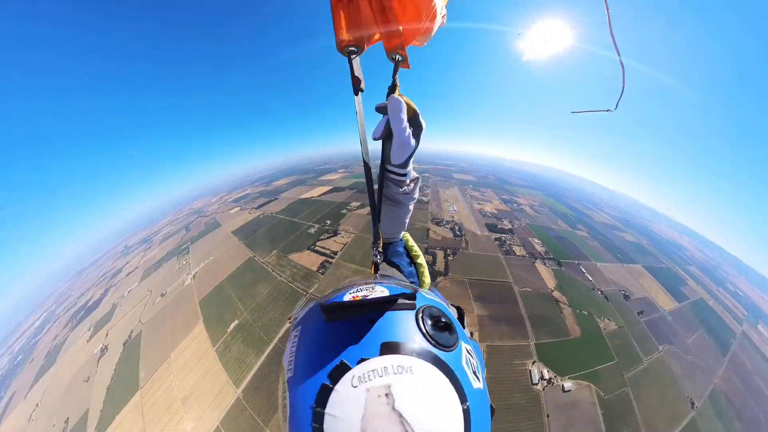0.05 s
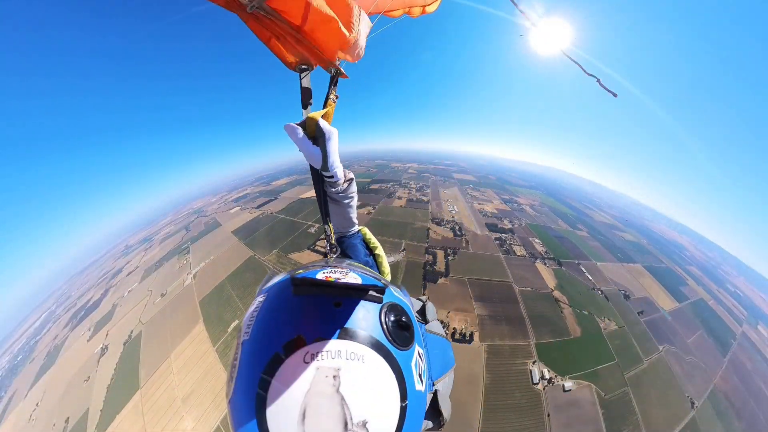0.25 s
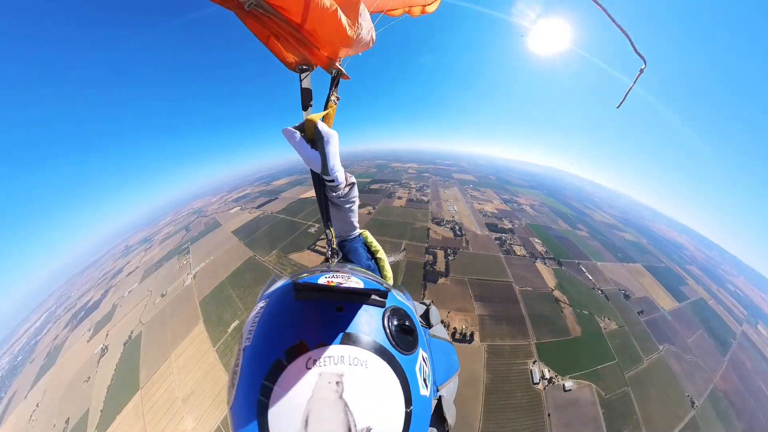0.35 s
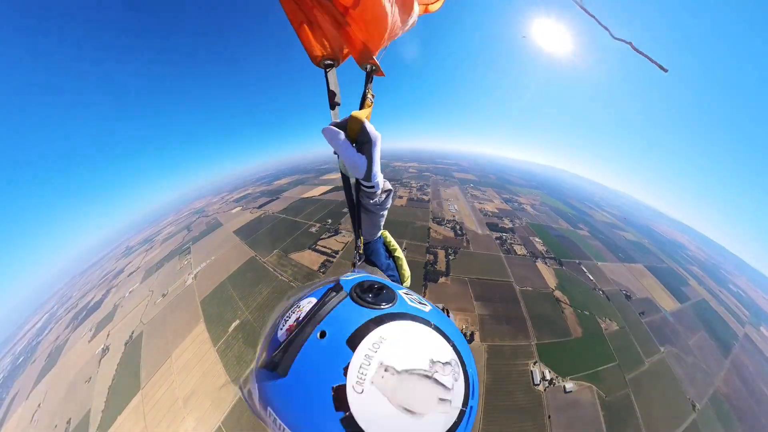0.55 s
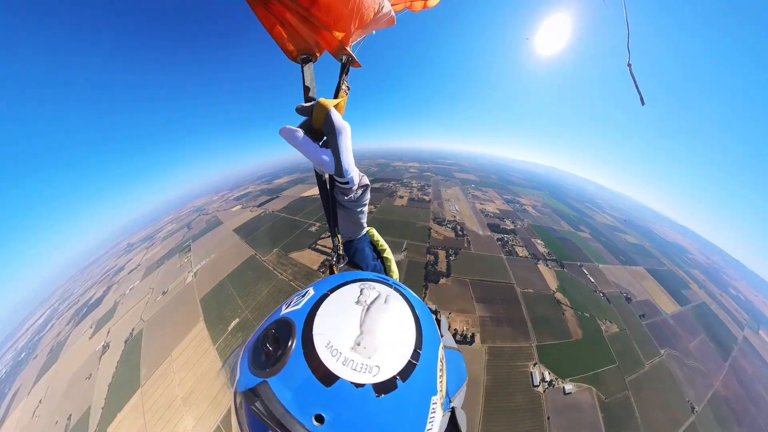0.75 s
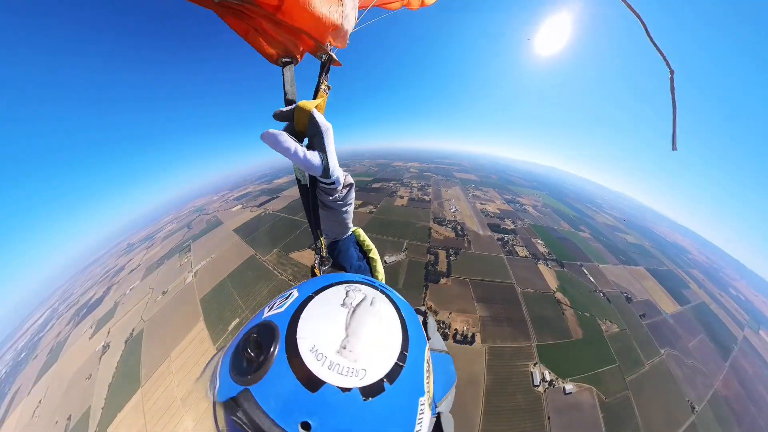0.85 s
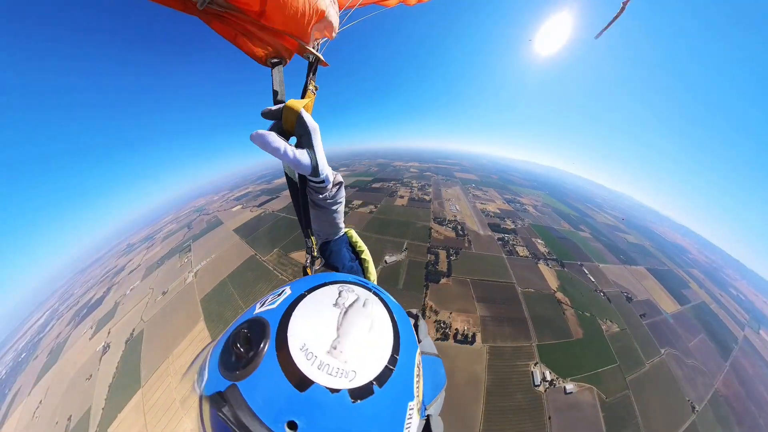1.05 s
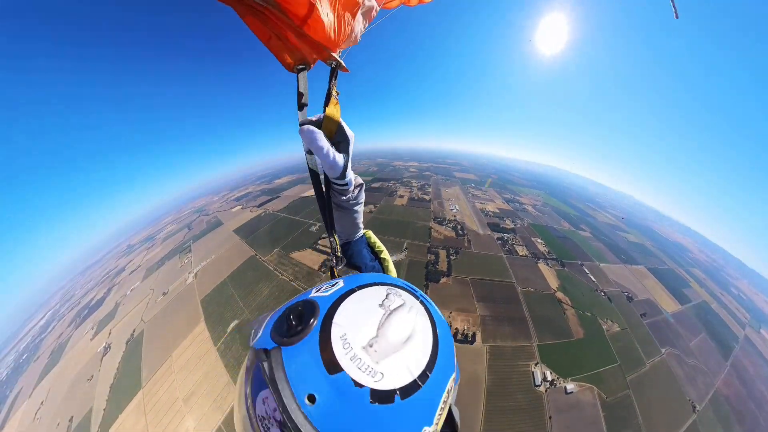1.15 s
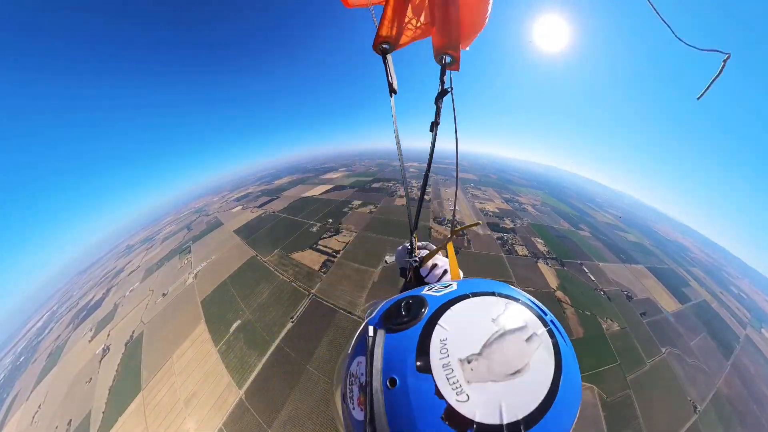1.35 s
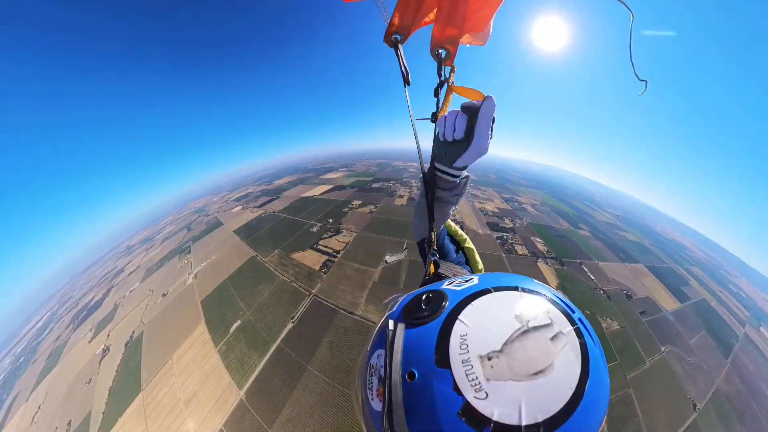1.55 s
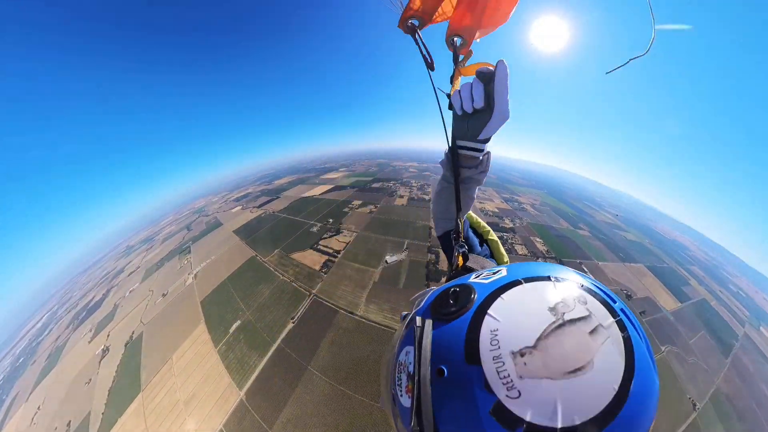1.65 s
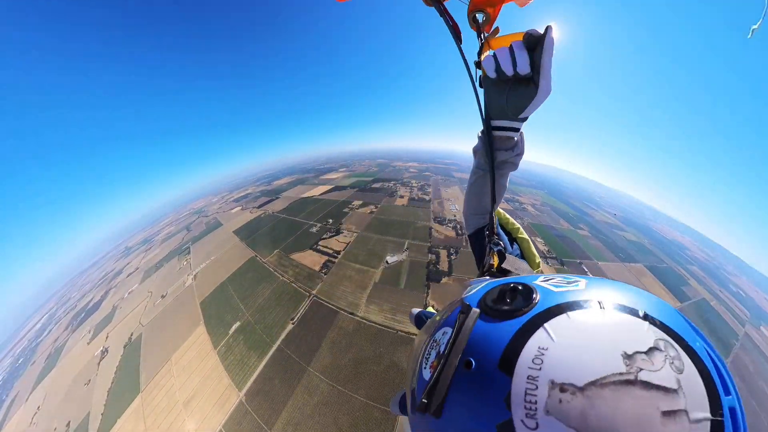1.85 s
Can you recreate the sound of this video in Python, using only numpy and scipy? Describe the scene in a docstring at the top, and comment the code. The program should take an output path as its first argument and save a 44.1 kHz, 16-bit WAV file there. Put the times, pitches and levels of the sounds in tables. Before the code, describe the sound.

Wind buffets a camera microphone under an open parachute, in two rough gusts with a weaker one between and fabric snapping at their peaks. Then the rigging bumps the mount and straps tick in softer airflow.

```python
"""A low rush of air, then two long gusts with a weaker one between, buffeting a camera microphone
under a parachute. Each gust is a lumpy roar of turbulent eddies with a grainy rasp on top, and taut
fabric snaps at the height of the long ones. Afterwards the rigging bumps the camera mount, a line
swishes, straps tick and buckles jingle in the steady airflow."""
import sys
import numpy as np
from scipy import signal
from scipy.fft import rfft, irfft, next_fast_len
from scipy.io import wavfile
from scipy.ndimage import uniform_filter1d, minimum_filter1d

SR = 44100
rng = np.random.default_rng(int(sys.argv[2]) if len(sys.argv) > 2 else 0)


def dump_mix(stems):
    """Bounce the given channels to the path in sys.argv[1] as a 16-bit WAV at rate SR."""
    frames = np.atleast_2d(stems).T  # one column per channel
    limited = np.clip(frames, -1, 1)  # hard clip at full scale
    pcm = np.round(limited * 32767).astype(np.int16)
    wavfile.write(sys.argv[1], SR, pcm)


N = 83790
TIME = np.arange(N) / SR

# Envelopes of the wind. Each row: time in seconds, level in dB.
FLOW_ENVELOPE = [(0, -45), (0.17, -44.5), (0.3, -29.5), (1.3, -51), (1.47, -33.5), (1.525, -38),
                 (1.548, -27), (1.575, -34.5), (1.635, -37), (1.67, -31), (1.705, -40.5), (1.745, -34),
                 (1.78, -41), (1.9, -39.5)]  # airflow of the glide
RUMBLE_ENVELOPE = [(0, -46.5), (0.16, -43), (0.28, -31.5), (0.5, -41.5), (0.75, -34), (0.95, -43.5),
                   (1.3, -35), (1.52, -37), (1.62, -33), (1.68, -42.5), (1.9, -41.5)]  # low rumble of the mount
RASP_ENVELOPE = [(0.195, -100), (0.21, -57), (0.221, -30.5), (0.28, -26.5), (0.43, -28.5), (0.48, -31.5),
                 (0.61, -29.5), (0.695, -34), (0.72, -48.5), (0.85, -50.5), (0.872, -31), (0.922, -21),
                 (0.96, -39), (1.0, -40), (1.06, -30.5), (1.12, -28.5), (1.24, -34), (1.27, -41.5),
                 (1.345, -35.5), (1.38, -43), (1.41, -59), (1.6, -61.5), (1.8, -95)]  # coarse grains
FIZZ_ENVELOPE = [(0.22, -100), (0.24, -66), (0.28, -53.5), (0.35, -55), (0.405, -46.5), (0.48, -58.5),
                 (0.62, -54.5), (0.68, -58.5), (0.73, -94), (0.86, -92), (0.92, -50.5), (1.0, -64.5),
                 (1.09, -51.5), (1.235, -56), (1.27, -70), (1.35, -58), (1.42, -93)]  # fine treble grains
SURGE_ENVELOPE = [(0.12, -58.5), (0.27, -28.5), (0.38, -25), (0.405, -31), (0.45, -22.5), (0.56, -28.5),
                  (0.67, -34), (0.725, -37.5), (0.745, -23), (0.86, -43), (0.92, -33.5), (1.0, -26),
                  (1.08, -21.5), (1.16, -27.5), (1.28, -27), (1.38, -42.5)]  # large, slow eddies
ROAR_ENVELOPE = [(0.19, -72), (0.21, -33.5), (0.222, -31), (0.25, -30.5), (0.276, -20), (0.45, -20.5),
                 (0.57, -21), (0.65, -25.5), (0.685, -36), (0.736, -31), (0.744, -19.5), (0.79, -27),
                 (0.83, -24.5), (0.842, -43.5), (0.868, -32.5), (0.902, -30), (0.92, -15.5), (0.97, -17.5),
                 (1.02, -22.5), (1.09, -20.5), (1.24, -19.5), (1.285, -21), (1.305, -31.5), (1.39, -35.5),
                 (1.43, -68)]  # eddies striking the microphone

# Spectral shapes of the sources. Each row: frequency in Hz, relative level in dB.
HISS_SPECTRUM = [(1000, -32), (6000, -4), (10000, -4.5), (13000, -9.5), (16000, -10)]
FLOW_SPECTRUM = [(15, -33.5), (35, -12.5), (100, 6.5), (250, 1.5), (380, 5), (560, -3), (660, -0.5),
                 (760, -8), (1000, -5.5), (1450, -16.5), (1560, -27.5), (2000, -23.5), (3000, -39),
                 (4200, -41.5), (6000, -50.5), (16000, -66.5)]
RUMBLE_SPECTRUM = [(15, -44), (30, -16.5), (45, 2.5), (58, 7.5), (80, 5.5), (130, -3), (400, -60),
                   (2000, -91.5)]
SWISH_SPECTRUM = [(3000, -42), (10000, -13), (12500, -13), (13500, -2), (15500, -8)]
SCUFF_SPECTRUM = [(100, -6), (500, -7), (1400, 1), (1600, -11), (1950, -5.5), (2400, -19), (3200, -20),
                  (4000, -59), (16000, -70)]
BODY_SPECTRUM = [(20, -25.5), (60, -20), (200, -2), (600, 7), (1200, 0), (1700, -11.5), (3000, -31.5),
                 (8000, -58), (16000, -79)]  # dull part of a strap tick
EDGE_SPECTRUM = [(100, -42), (500, 7.5), (1500, 0.5), (2000, 6), (2300, 1.5), (2700, -3), (3200, -11),
                 (4200, -11.5), (6200, -20.5), (8000, -39.5), (16000, -65)]  # bright part of a tick, and the crackles in the gusts
SNAP_SPECTRUM = [(500, -10), (2000, 4.5), (4300, 1), (6500, -7), (9000, -12.5), (13000, -27.5),
                 (16000, -38)]
RASP_SPECTRUM = [(40, -26.5), (150, -11.5), (500, 4), (1350, 4.5), (1600, -4.5), (2100, -4), (3200, -11.5),
                 (4200, -13.5), (5500, -34), (7500, -53.5), (11000, -73.5), (16000, -71.5)]
FIZZ_SPECTRUM = [(500, -32.5), (2000, -11), (4500, 4.5), (6500, -2), (9000, -17), (12000, -40),
                 (16000, -53.5)]
SURGE_SPECTRUM = [(40, -27), (100, -13), (160, 0.5), (230, 0), (320, -12), (600, -50), (2000, -91.5)]
ROAR_SPECTRUM = [(40, -27.5), (90, -7.5), (170, -3.5), (300, 1), (500, 0), (800, -6), (1350, -15),
                 (1600, -23), (2200, -28), (4000, -60.5), (5500, -81.5), (16000, -100)]

# Stereo width. Each row: frequency in Hz, gain of the side signal in dB.
SCENE_WIDTH = [(300, -77.5), (1500, -61.5), (2850, -55), (3080, -14.5), (3400, -4.5), (4300, -16),
               (6000, -15.5), (8000, -19.5), (14000, -17)]
HISS_WIDTH = [(300, -69), (2850, -33), (3100, -1), (7000, -3), (12000, -5)]

# Jingles of small buckles. Each row: start in seconds, level in dB.
BUCKLE_JINGLES = [(0.792, -74.5), (1.565, -79), (1.665, -63.5), (1.74, -71)]
# Modes of the buckles. Each row: frequency in Hz, relative level in dB.
BUCKLE_MODES = [(4600, -0.5), (5250, -6), (5950, 2), (6450, -2.5), (8200, -7)]
# Bumps on the mount. Each row: start in seconds, level in dB, pitch in Hz, 60 dB decay time in seconds.
MOUNT_BUMPS = [(1.402, -18, 112.6, 0.043), (1.538, -15.5, 127, 0.021), (1.563, -20, 53, 0.21)]
# Strap ticks. Each row: start in seconds, body drive in dB, edge drive in dB, edge cutoff in Hz.
STRAP_TICKS = [(0.745, -16.5, -36.5, 4000), (0.827, -31, -29.5, 4560), (0.915, -8, -33, 3980),
               (0.979, -39, -35, 9900), (1.288, -16.5, -23.5, 8960), (1.463, -37, -50, 2500),
               (1.487, -26.5, -32.5, 2790), (1.508, -23, -42, 2500), (1.576, -37, -34, 6450),
               (1.662, -29, -29, 8050), (1.7, -38, -39, 5000), (1.721, -23, -53, 2400),
               (1.73, -23, -47, 2200), (1.737, -40, -32, 6500), (1.745, -27, -36, 4000)]
# Snaps of the fabric. Each row: start in seconds, level in dB.
FABRIC_SNAPS = [(0.38, -38.5), (0.408, -33), (0.426, -37), (0.511, -38), (0.546, -45), (1.062, -37),
                (1.079, -32), (1.093, -31.5), (1.107, -31), (1.132, -31), (1.163, -33), (1.173, -39),
                (1.216, -27), (1.236, -33), (1.737, -51)]


def from_db(db):
    """Amplitude grows tenfold for every 20 dB."""
    return 10 ** (np.asarray(db) / 20)


def unit_rms(x):
    """Normalisation to a mean power of one."""
    return x / np.sqrt(np.mean(x ** 2) + 1e-20)


def level(envelope):
    """Gain over time, interpolated linearly in decibels."""
    return from_db(np.interp(TIME, *np.transpose(envelope)))


def decays(events, t60):
    """Exponential decay: the gain jumps at each event, then falls 60 dB in t60 seconds."""
    return sum((TIME >= s) * from_db(db - 60 * np.maximum(TIME - s, 0) / t60) for s, db in events)


def flutter(spread_db, hz):
    """Random amplitude modulation: a gain whose level follows low-pass noise."""
    pole = np.exp(-2 * np.pi * hz / SR)
    drift = signal.lfilter([1], [1, -2 * pole, pole * pole], rng.standard_normal(2 * N))[N:]
    return from_db(spread_db * unit_rms(drift))


def colour(x, spectrum):
    """Minimum-phase filtering: folding the cepstrum makes the response follow its cause."""
    size = 2 * next_fast_len(N)
    hz, db = np.transpose(spectrum)
    bin_hz = np.arange(size // 2 + 1) * SR / size
    log_gain = np.log(from_db(np.interp(np.log(bin_hz + 1), np.log(hz), db)))
    cepstrum = irfft(log_gain)
    cepstrum[1:size // 2] *= 2
    cepstrum[size // 2 + 1:] = 0
    return irfft(rfft(x, size) * np.exp(rfft(cepstrum)))[..., :N]


def strike(kicks, spectrum):
    """Convolution with an impulse response whose peak is one."""
    return colour(kicks, spectrum) / np.abs(colour(signal.unit_impulse(N), spectrum)).max()


def resonate(x, hz, width_hz):
    """A damped oscillator: a unit kick starts a decaying sine of amplitude one."""
    radius, angle = np.exp(-np.pi * width_hz / SR), 2 * np.pi * hz / SR
    return signal.lfilter([0, np.sin(angle)], [1, -2 * radius * np.cos(angle), radius ** 2], x + 1e-18)


def grains(per_s, spread_db):
    """A Poisson process of pressure kicks, uneven in size and sign; mid and side rows."""
    sizes = from_db(spread_db * np.minimum(rng.exponential(1, (2, N)), 5))
    return sizes * rng.choice([-1, 1], (2, N)) * (rng.random((2, N)) < per_s / SR)


def shot_noise(spectrum, per_s, spread_db):
    """Filtered random kicks superpose into a grainy noise of unit power."""
    return unit_rms(colour(grains(per_s, spread_db), spectrum))


def smooth_noise(spectrum):
    """Filtered Gaussian noise of unit power; mid and side rows."""
    return unit_rms(colour(rng.standard_normal((2, N)), spectrum))


def stereo(rows, width):
    """Left and right are the sum and difference of the mid and the filtered side."""
    mid, side = rows[0], colour(rows[1], width)
    return np.array([mid + side, mid - side])


def microphone_hiss():
    """Self-noise of the microphones sets a faint, constant floor."""
    return from_db(-79) * smooth_noise(HISS_SPECTRUM)


def airflow():
    """Broadband flow noise of the glide, with a faint hollow resonance and the rumble of the mount."""
    rush = smooth_noise(FLOW_SPECTRUM) * level(FLOW_ENVELOPE)
    rumble = smooth_noise(RUMBLE_SPECTRUM) * level(RUMBLE_ENVELOPE)
    hum = from_db(-52) * unit_rms(resonate(smooth_noise(FLOW_SPECTRUM), hz=649, width_hz=38))
    return rush * flutter(spread_db=2.06, hz=25) + hum + rumble


def line_swish(peak_s=1.485, width_s=0.032):
    """Sliding friction of a line gives a brief swell of faint, very high noise."""
    swell = np.exp(-.5 * ((TIME - peak_s) / width_s) ** 2)
    return from_db(-69.5) * swell * smooth_noise(SWISH_SPECTRUM)


def buckle_jingles():
    """Modal ringing: each mode of the buckles is excited by its own run of light touches."""
    ring = sum(from_db(db) * resonate(grains(per_s=400, spread_db=4.5), hz, width_hz=110)
               for hz, db in BUCKLE_MODES)
    return unit_rms(ring) * decays(BUCKLE_JINGLES, t60=0.2)


def strap_scuff(start_s=1.4, rise_s=0.0025, hold_s=0.021, t60=0.054):
    """Friction of webbing makes a short, dull rub along with the first bump."""
    age = np.maximum(TIME - start_s, 0)
    envelope = np.minimum(age / rise_s, 1) * from_db(-38 - 60 * np.maximum(age - hold_s, 0) / t60)
    return envelope * shot_noise(SCUFF_SPECTRUM, per_s=5000, spread_db=4)


def mount_bumps(attack_s=0.0177):
    """Damped vibration: each soft push of the rigging swings the mount for a few cycles."""
    bumps = np.zeros(N)
    for s, db, hz, t60 in MOUNT_BUMPS:
        age = np.maximum(TIME - s, 0)
        envelope = np.minimum(age / attack_s, 1) * from_db(db - 60 * np.maximum(age - attack_s, 0) / t60)
        bumps += envelope * np.sin(2 * np.pi * hz * age)
    return bumps


def strap_ticks(rustle_db=-19, rustle_s=0.0015):
    """Impulse excitation: a kick and its brief rustle give a dull body, a bright edge and a short ring."""
    body, edge = np.zeros((2, 2, N))
    rustle_envelope = from_db(rustle_db) * np.exp(-TIME / rustle_s)
    for s, body_db, edge_db, cutoff_hz in STRAP_TICKS:
        start = int(s * SR)
        kick = (rng.standard_normal((2, N)) * rustle_envelope)[:, :N - start]
        kick[:, 0] -= 1
        lowpass = signal.butter(3, cutoff_hz, fs=SR, output="sos")
        body[:, start:] += from_db(body_db) * kick
        edge[:, start:] += from_db(edge_db) * signal.sosfilt(lowpass, kick + 1e-18)
    ring = from_db(-18) * resonate(edge, hz=2460, width_hz=360)
    return strike(body, BODY_SPECTRUM) + strike(edge, EDGE_SPECTRUM) + ring


def fabric_snaps():
    """Taut fabric radiates an impulse as it cracks in the wind, then a decaying crinkle."""
    crinkle = unit_rms(grains(per_s=3500, spread_db=4.5))
    kicks = from_db(-18) * decays(FABRIC_SNAPS, t60=0.064) * crinkle
    for s, db in FABRIC_SNAPS:
        kicks[0, int(s * SR)] += from_db(db)  # the crack itself is centred
    return strike(kicks, SNAP_SPECTRUM)


def gust_rasp():
    """Shot noise: gusts scrape the housing in tiny kicks, with stray crackles and a treble fizz."""
    coarse = shot_noise(RASP_SPECTRUM, per_s=5000, spread_db=4)
    crackle = from_db(-10) * shot_noise(EDGE_SPECTRUM, per_s=170, spread_db=1.5)
    fizz = shot_noise(FIZZ_SPECTRUM, per_s=2200, spread_db=4)
    rasp = (coarse + crackle) * level(RASP_ENVELOPE) + fizz * level(FIZZ_ENVELOPE)
    return rasp * flutter(spread_db=2, hz=47.3)


def gust_buffet():
    """Turbulent pressure: eddies slap the microphone in a dense roar; large ones swell underneath."""
    roar = shot_noise(ROAR_SPECTRUM, per_s=1800, spread_db=1.65) * level(ROAR_ENVELOPE)
    surge = shot_noise(SURGE_SPECTRUM, per_s=1800, spread_db=1.65) * level(SURGE_ENVELOPE)
    return (roar + surge) * flutter(spread_db=1.0, hz=24.4)


def scene():
    """Superposition of all sources, centred in the bass and slightly wide in the treble."""
    wind = gust_buffet() + gust_rasp() + airflow()
    gear = strap_ticks() + fabric_snaps() + buckle_jingles() + strap_scuff() + mount_bumps()
    return stereo(wind + gear + line_swish(), SCENE_WIDTH) + stereo(microphone_hiss(), HISS_WIDTH)


def record(dry, limit_db=-6.5, window_s=0.0057, cutoff_hz=15700):
    """Look-ahead limiting holds down the hardest buffets; a steep low-pass then cuts the top."""
    window = int(window_s * SR)
    allowed = np.minimum(1, from_db(limit_db) / (np.abs(dry).max(axis=0) + 1e-9))
    held = minimum_filter1d(allowed, window)
    gain = uniform_filter1d(uniform_filter1d(held, window // 2), window // 2)
    lowpass = signal.ellip(10, .1, 80, cutoff_hz, fs=SR, output="sos")
    return signal.sosfilt(lowpass, dry * gain)


dry = scene()
out = record(dry)
dump_mix(out)
```